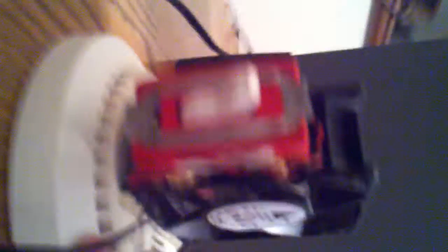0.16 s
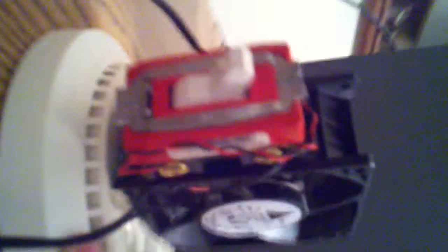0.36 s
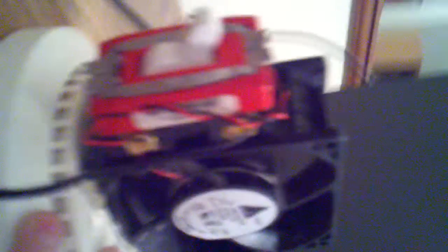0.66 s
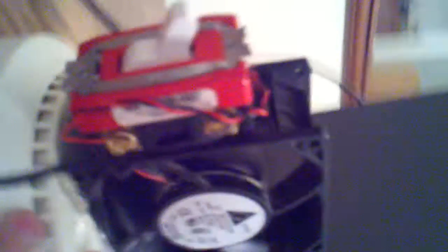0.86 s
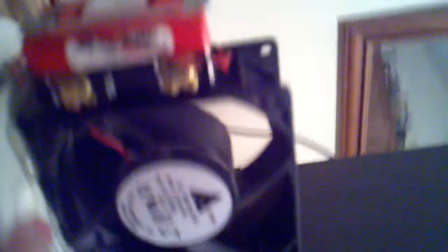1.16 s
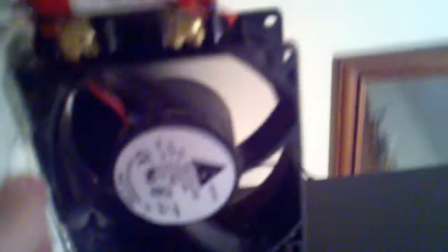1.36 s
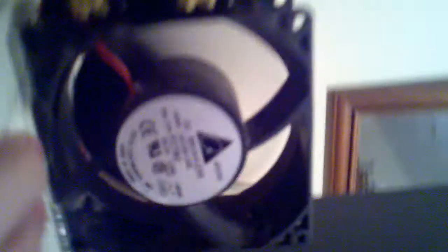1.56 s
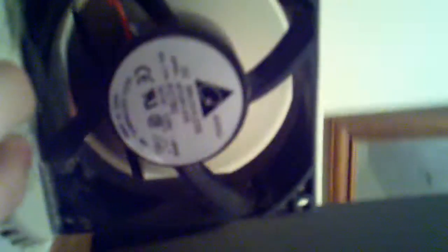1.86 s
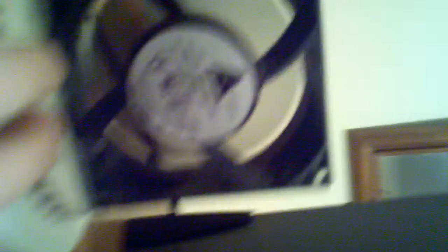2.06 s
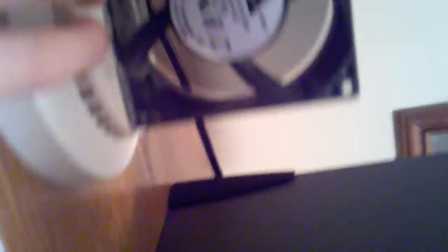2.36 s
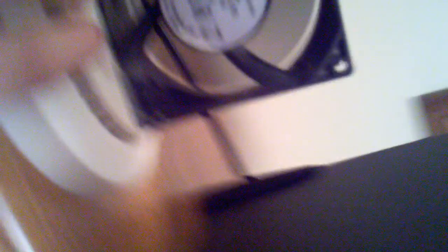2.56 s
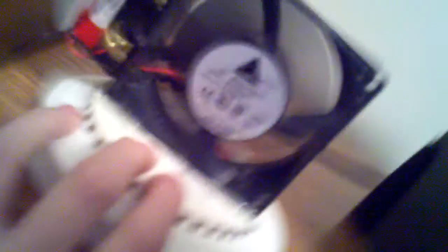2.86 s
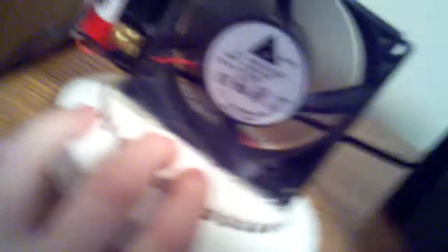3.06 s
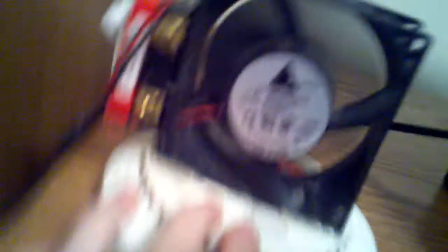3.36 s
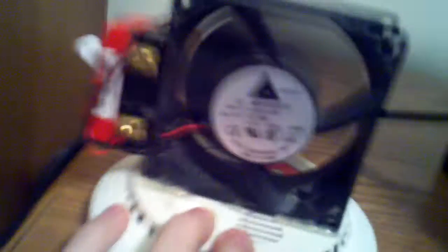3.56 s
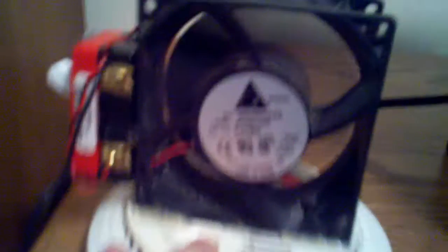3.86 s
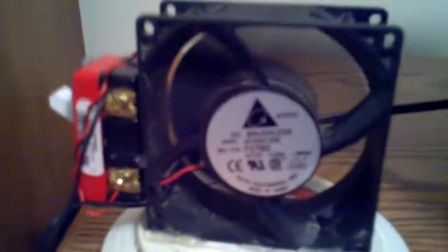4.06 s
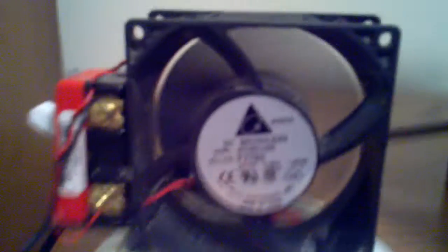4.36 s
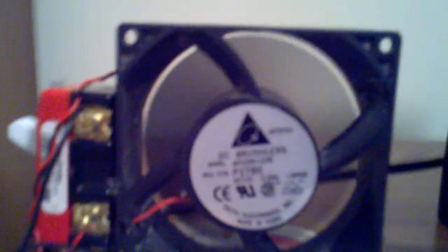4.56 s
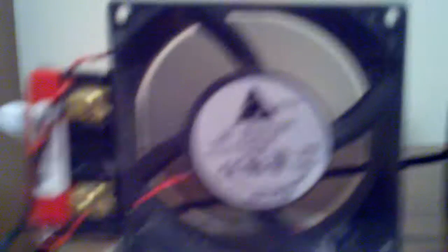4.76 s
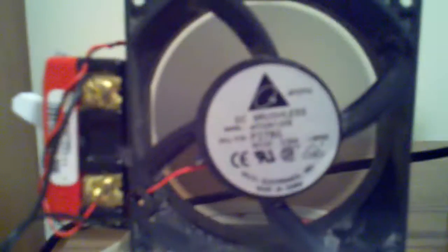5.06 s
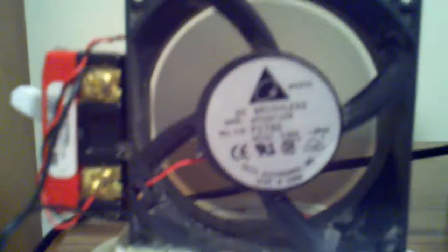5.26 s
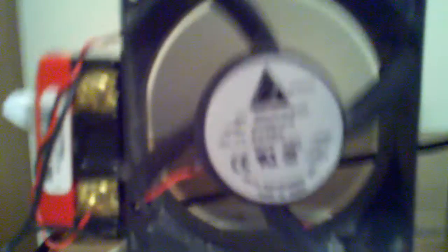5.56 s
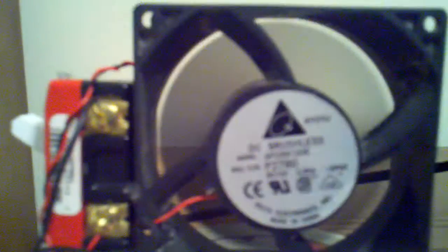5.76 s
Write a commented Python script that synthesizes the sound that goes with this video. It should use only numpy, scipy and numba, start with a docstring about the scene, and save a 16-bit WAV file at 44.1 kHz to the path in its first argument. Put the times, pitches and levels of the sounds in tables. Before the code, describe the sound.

A small cooling fan is already running at full, constant speed on a desk indoors, very close to a hand-held camera microphone. For the first second it is loud and clear: a steady nasal whine around 1 kHz, slightly wavering, with thin higher motor tones and a broad hiss of rushing air. Around 1.0-1.2 s the air stream reaches the microphone; heavy thumps, snaps and harsh crackling blasts overload it until about 1.75 s, and the automatic level drops sharply, leaving the fan faint behind. From about 1.9 to 2.5 s there is a softer, low rumbling lull with the whine audible. A thump at 2.54 s and stronger bumps from 2.7 s bring back dull, bassy buffeting. From 3.4 s it turns rougher, with dense crackles, flutters and pops, and a short hard knock near 4.55 s. It eases somewhat around 5 s, smoother and gustier, then roughens again near 5.6 s, continuing to the cut-off.

```python
"""A small brushless fan runs at full speed on a desk, close to a hand-held camera: sine blade and motor tones
over a rush of air and faint rough bands, both of filtered noise.
After a second the camera moves into the air stream and eddies buffet one of its two microphone ports:
noise rumble and crackle, with shaped pressure pulses for thumps, snaps and, later, short ringing knocks.
The first blasts push the gain control down by over 20 dB, and the fan stays faint under the buffeting."""
import sys
import numpy as np
from scipy import signal
from scipy.fft import rfft, irfft, next_fast_len
from scipy.io import wavfile
from numba import njit

SR = 44100
rng = np.random.default_rng(int(sys.argv[2]) if len(sys.argv) > 2 else 0)


def wav_record(signal):
    """Record a signal, one row per channel, as 16-bit PCM in the file named by sys.argv[1]."""
    frames = np.transpose(np.atleast_2d(signal))
    bounded = np.clip(frames, -1, 1)
    # unit amplitude maps onto the largest positive 16-bit level
    quanta = np.round(bounded * 32767).astype(np.int16)
    wavfile.write(sys.argv[1], SR, quanta)


N = 261513
TIME = np.arange(N) / SR
SIZE = next_fast_len(N + 2048)  # transform length, with room for filter tails
FREQ = np.maximum(np.arange(SIZE // 2 + 1) * SR / SIZE, 1)

# Nearness of the fan. Each row: time in seconds, change of the rushing air in dB, change of the blade tones in dB.
FAN_NEARNESS = [(0, -3, -1), (.3, -1.5, -0.5), (.6, -0.5, 0.5), (.9, 1.5, 1), (1.3, 1, -3.5), (2.3, 1, 1),
                (3.3, 0.5, 0.5), (3.9, -2.5, -6), (4.6, -1, -3), (4.9, 0.5, 0.5), (5.55, 2, 2),
                (5.93, -1, -3)]
# Air stream on the microphone. Each row: time in seconds, force in dB, roughness in dB (crackle against rumble).
AIR_STREAM = [(0, -103, -23), (.45, -82, -27), (.88, -56.5, -42), (1.14, -35, -57), (1.24, -15, -9.5),
              (1.36, -18, -9), (1.41, -18.5, -5), (1.56, -19, -3.5), (1.64, -17.5, -5), (1.77, -28.5, -6),
              (1.95, -26.5, -23), (2.25, -29.5, -68), (2.63, -26, -29), (2.74, -17.5, -16.5),
              (2.9, -19.5, -42), (3.36, -21.5, -29.5), (3.53, -15, -10), (3.85, -21, -8), (4.3, -18, -11),
              (4.43, -20, -4), (4.9, -28.5, -9), (5.36, -25.5, -11.5), (5.62, -19.5, -9), (5.78, -24, -5.5),
              (5.93, -17.5, -11.5)]
# Colours of small whirls: flutter, crackle, fizz. Each row: frequency in Hz, relative density in dB per Hz.
FLUTTER_COLOUR = [(100, -16), (200, 4), (320, 0.5), (480, -3.5), (700, -12.5), (1100, -20), (2500, -59.5)]
CRACKLE_COLOUR = [(200, -56), (450, -3), (750, -1), (1100, -3.5), (1800, -11), (2600, -26), (4000, -43),
                  (6000, -66), (10000, -63)]
FIZZ_COLOUR = [(600, -0.5), (1600, 1.5), (2500, -2), (3800, -11.5), (5000, -24), (8000, -21), (14000, -55)]


def undb(db):
    """Decibels to gain."""
    return 10 ** (np.asarray(db) / 20)


def curves(table):
    """Each column of a table, joined by straight lines in time."""
    s, *columns = np.transpose(table)
    return [np.interp(TIME, s, c) for c in columns]


def colour_gain(points):
    """Gain at each frequency from (Hz, dB) points, joined along a logarithmic pitch scale."""
    hz, db = np.transpose(points)
    return undb(np.interp(np.log(FREQ), np.log(hz), db))


def shaped_noise(gain):
    """Noise of unit level with the given gain at each frequency."""
    x = irfft(rfft(rng.standard_normal(SIZE)) * gain, SIZE)[:N]
    return x / x.std()


def noise(points):
    """Noise of unit level with the colour of (Hz, dB) points."""
    return shaped_noise(colour_gain(points))


def band_noise(centre_hz, width_hz):
    """A rough band: noise of unit level that peaks at one frequency."""
    return shaped_noise(1 / (1 + (2 * (FREQ - centre_hz) / width_hz) ** 2))


def walk(rate):
    """Smooth chance of unit spread, moving at up to about `rate` Hz."""
    return shaped_noise(1 / (1 + (FREQ / rate) ** 4))


def tones(turn, orders, waver_db):
    """Sines on multiples of the shaft angle, each wavering in level."""
    out = 0
    for order, db in orders:
        start = rng.uniform(0, 2 * np.pi)
        level = undb(db + waver_db * walk(20))
        out = out + level * np.sin(order * turn + start)
    return np.sqrt(2) * out


def both_ports(sound, lag):
    """Direct sound reaches the second port `lag` samples later."""
    return np.array([sound, np.pad(sound, (lag, 0))[:N]])


def whine(shaft_hz=93.9, wobble=0.00061, blade_waver_db=0.0, motor_waver_db=1.0,
          second_hz=1006.2, second_wobble=0.0012, second_waver_db=2.0,
          blur_db=-75.0, blur_hz=1025, blur_width_hz=70):
    """Blade and motor tones locked to the unsteady shaft, and a second whine of its own pitch with a rough skirt."""
    # Blade tones. Each row: multiple of the shaft rate, relative level in dB.
    blade_orders = [(4, -64.5), (5, -72.5), (8, -77), (12, -54), (13, -97), (21, -83)]
    # Motor tones, nine pulses to a turn: low, cogging, top. Each row: multiple of the shaft rate, relative level in dB.
    motor_groups = [(9, -61), (18, -64.5)], [(36, -67)], [(45, -70.5), (72, -80), (90, -70)]
    # Each group of motor tones swells and fades in its own way.
    # Each row: time in seconds, then the change of the low, cogging and top tones in dB.
    group_changes = [(0, -7, -9, -8), (.32, -6, -11, -10), (.55, -1.5, -4, -0.5), (.78, 2, -1, 6),
                     (.95, -3, -6, 4.5), (1.3, -3, 5, 5), (2.2, -8, 2.5, -6), (3, 1, -4.5, -3),
                     (4, -5, 0, -1.5), (5.93, -11, -5, 5)]
    # Second, less steady whine. Each row: time in seconds, level in dB about which it wavers.
    second_level = [(0, -60.5), (.45, -62.5), (.7, -68), (1.1, -71), (2.2, -60), (5.9, -60)]

    turn = 2 * np.pi * np.cumsum(shaft_hz * (1 + wobble * walk(9.4))) / SR
    blades = tones(turn, blade_orders, blade_waver_db) * undb(curves(FAN_NEARNESS)[1])
    motor = 0
    for orders, change_db in zip(motor_groups, curves(group_changes)):
        motor = motor + tones(turn, orders, motor_waver_db) * undb(change_db)

    second_turn = 2 * np.pi * np.cumsum(second_hz * (1 + second_wobble * walk(8.7))) / SR
    second_gain = undb(curves(second_level)[0] + second_waver_db * walk(22))
    second = np.sqrt(2) * second_gain * np.sin(second_turn)
    blur = undb(blur_db) * band_noise(blur_hz, blur_width_hz)
    return both_ports(blades + second + blur, lag=5) + both_ports(motor, lag=2)


def rush(air_db=-50, flicker_db=1.0, shared_hz=350):
    """Air torn by the blades: coloured noise of which the two ports share only the long waves."""
    # Rushing air. Each row: frequency in Hz, relative density in dB per Hz.
    air_colour = [(40, -23), (120, 3), (260, 1.5), (400, -3.5), (620, -3.5), (800, 0), (1000, -2.5),
                  (1400, -6), (2500, -7.5), (4500, -4), (5400, -9), (7000, -5), (9200, -5), (12000, -10),
                  (14000, -12)]
    colour = colour_gain(air_colour)
    shared = 1 / (1 + (FREQ / shared_hz) ** 2)  # part of the power common to both ports
    share = np.sum(colour ** 2 * shared) / np.sum(colour ** 2)
    common = np.sqrt(share) * shaped_noise(colour * np.sqrt(shared))
    separate = np.array([shaped_noise(colour * np.sqrt(1 - shared)) for _ in range(2)])
    own = np.sqrt(1 - share) * separate
    return (common + own) * undb(air_db + curves(FAN_NEARNESS)[0] + flicker_db * walk(15.5))


def rough_bands():
    """Faint rough bands of hiss and thin whine, rising between 1 and 1.5 s."""
    # Rough bands. Each row: centre in Hz, width in Hz, level in dB once risen.
    bands = [(1680, 110, -68), (3750, 170, -83.5), (5800, 190, -62.5), (11100, 3300, -58.5)]
    rise = np.interp(TIME, [1.0, 1.5], [.2, 1])
    ports = [sum(undb(db) * band_noise(hz, width) for hz, width, db in bands) for _ in range(2)]
    return rise * np.array(ports)


def gusts(turbulence, spread_db):
    """Bursts of unit mean power whose level in dB follows the turbulence."""
    gain = undb(spread_db * turbulence)
    return gain / np.sqrt(np.mean(gain ** 2))


def grains(points, per_s, spread_db):
    """Sharp pressure kinks of uneven size at random moments, coloured by (Hz, dB) points; unit level."""
    struck = rng.random(N) < per_s / SR
    kinks = struck * undb(spread_db * rng.uniform(-1.04, 1, N))
    x = irfft(rfft(kinks, SIZE) * colour_gain(points), SIZE)[:N]
    return (x - x.mean()) / x.std()


def lulls(push_db, rough_db, lull_db=5, lull_hz=24, edge_db=-27, core_db=-14):
    """At the edge of the jet, where the flow is weak but rough, it comes in puffs with lulls between them (dB)."""
    at_edge = np.clip((core_db - push_db) / (core_db - edge_db), 0, 1)
    return lull_db * at_edge * undb(rough_db / 3) * (np.tanh(2 * walk(lull_hz)) - .5)


def stream(surge_db=-13, surge_growth=0.67, rumble_db=-1, flutter_db=3.5, crackle_db=-4, fizz_db=-6.0,
           rumble_spread_db=2.5, flutter_spread_db=2.0, crackle_spread_db=3.0, fizz_spread_db=4,
           fizz_growth=1.68):
    """Turbulence on the port: gentle flow surges and rumbles; rough flow adds small whirls that crackle in bursts."""
    # Deep surge and rumble of the flow. Each row: frequency in Hz, relative density in dB per Hz.
    surge_colour = [(20, -17), (40, 0.5), (70, -11.5), (105, -0.5), (150, -3), (250, -57), (600, -86)]
    rumble_colour = [(20, -32), (40, -51), (80, -3.5), (130, 5), (200, 1), (280, -2), (380, -11.5),
                     (520, -32), (800, -84), (2000, -79)]
    push_db, rough_db = curves(AIR_STREAM)
    push_db = push_db + lulls(push_db, rough_db)
    # slow and fast chance together, held within bounds
    turbulence = 2 * np.tanh((1.3 * walk(28.5) + 1.7 * walk(314)) / 2)

    surge = undb(surge_db + surge_growth * push_db) * noise(surge_colour)
    rumble = undb(rumble_db) * gusts(turbulence, rumble_spread_db) * noise(rumble_colour)
    flutter = undb(flutter_db) * gusts(turbulence, flutter_spread_db) * noise(FLUTTER_COLOUR)
    crackle_grains = grains(CRACKLE_COLOUR, per_s=700, spread_db=9.5)
    crackle = undb(crackle_db) * gusts(turbulence, crackle_spread_db) * crackle_grains
    fizz_grains = grains(FIZZ_COLOUR, per_s=1000, spread_db=-1.5)
    fizz = undb(fizz_db) * gusts(turbulence, fizz_spread_db) * fizz_grains

    # the finer the whirls, the more they depend on roughness
    whirls = undb(rough_db / 2) * flutter + undb(rough_db) * crackle + undb(fizz_growth * rough_db) * fizz
    return surge + undb(push_db) * (rumble + whirls)


def random_eddies(median_gap_s=1 / 17, smoothing=0.14, thump_db=7.5, crackle_db=9.5, spread_db=5):
    """Rows (s, thump dB, crackle dB) of eddies shed at uneven intervals, following the stream's force and roughness."""
    gap, thump, crackle = rng.standard_normal((400, 3)).T
    times = np.cumsum(np.exp(.7 * gap)) * median_gap_s
    push_db, rough_db = (np.interp(times, TIME, c) for c in curves(AIR_STREAM))
    thumps_db = push_db + smoothing * rough_db + thump_db + spread_db * thump
    crackles_db = push_db + rough_db + crackle_db + spread_db * crackle
    rows = np.column_stack([times, thumps_db, crackles_db])
    return rows[times < TIME[-1]]


def bursts(times, dbs, source, rise_s, fall_s):
    """A short bell-shaped piece of the source at each time, brought to the given level."""
    out = np.zeros(N)
    for s, db in zip(times, dbs):
        near = slice(*np.searchsorted(TIME, [s - 4 * rise_s, s + 4 * fall_s]))
        t = TIME[near] - s
        shape = np.exp(-.5 * (t / np.where(t < 0, rise_s, fall_s)) ** 2)
        piece = shape * source[near]
        levelling = np.sqrt(np.sum(shape ** 2) / (np.sum(piece ** 2) + 1e-18))
        out[near] += undb(db) * piece * levelling
    return out


def eddies(rows, thump_db=1.5, core_s=0.00056, reach_s=0.0037, wake_db=-9, wake_rise_s=0.0028, wake_s=0.0048,
           burst_rise_s=0.0012, burst_s=0.0012, crackle_db=-2.0, fizz_db=-12.5):
    """An eddy crossing the port gives a pointed push between shallow troughs, a fluttering wake and a crackle."""
    thumps = np.zeros(N)
    chance = rng.standard_normal((len(rows), 2))
    for (s, db, _), (lean, girth) in zip(rows, chance):
        near = slice(*np.searchsorted(TIME, [s - 5 * reach_s, s + 5 * reach_s]))
        t = (TIME[near] - s) * np.exp(0.12 * girth)
        push = 1 / (core_s + 1j * t) - 1 / (reach_s + 1j * t)
        leaning = np.real(np.exp(.6j * lean) * push)  # the lean makes the push lopsided
        swirl = leaning * np.exp(-.5 * (t / reach_s) ** 2)
        thumps[near] += undb(db + thump_db) * swirl / np.abs(swirl).max()

    times, push_db, burst_db = np.transpose(rows)
    wake = bursts(times, push_db + wake_db, noise(FLUTTER_COLOUR), wake_rise_s, wake_s)
    crackle = grains(CRACKLE_COLOUR, per_s=2700, spread_db=6.5)
    fizz = undb(fizz_db) * grains(FIZZ_COLOUR, per_s=2500, spread_db=6.5)
    breakup = bursts(times, burst_db + crackle_db, crackle + fizz, burst_rise_s, burst_s)
    return thumps + wake + breakup


def snaps(snap_db=-2, lean_spread=0.5, swarm_db=-8, swarm_s=0.0024, swarm_spread_db=2, port_hz=5200, count=4):
    """Pressure snaps, sharp to dull as their cores widen, each a swing of pressure amid weaker ones."""
    # Pressure snaps. Each row: time in seconds, relative level in dB, width of the core in seconds.
    pressure_snaps = [(1.2223, -8, 0.00017), (1.2424, -10.5, 0.00015), (1.2803, -12, 0.00013),
                      (1.3023, -9, 0.00015), (1.3992, -8, 0.00013), (1.4092, -8.5, 0.0001),
                      (1.4197, -10, 0.00011), (1.4404, -8, 0.00017), (1.4603, -7, 0.00019),
                      (1.477, -8, .00018), (1.49, -6, 0.00018), (1.5495, -10, .00016),
                      (1.5675, -6, 0.00016), (1.5975, -2, 0.00017), (1.6113, -5, 0.00017),
                      (1.6459, -17, .00018), (1.867, -12.5, 0.00038), (2.537, -8, .00022),
                      (2.748, -4.5, .00033), (2.799, -10, 0.00045), (2.827, -6, 0.00036),
                      (3.4416, -6, .00015), (3.552, -8.5, .0002), (3.5958, -9, 0.00016),
                      (3.6382, -5.5, 0.00014), (3.726, -9.5, 0.00017), (3.7754, -11, 0.00017),
                      (3.9637, -12.5, 0.00016), (4.03, -10, 0.00018), (4.0473, -5.5, .0002),
                      (4.08, -8, 0.00021), (4.15, -13, 0.00014), (4.174, -11, 0.00028),
                      (4.4209, -7.5, 0.00014), (4.4444, -14, .0002), (4.6075, -10.5, .00015),
                      (5.1205, -8, 0.00036), (5.3655, -11, 0.0002), (5.39, -12, 0.00032),
                      (5.643, -4.5, 0.00016), (5.6617, -8.5, 0.00016), (5.728, -8, 0.00021)]
    out = np.zeros(N)
    weaker = np.arange(count + 1) > 0  # the first is the main snap, the others its swarm
    chance = rng.standard_normal((len(pressure_snaps), 3, count + 1))
    for (s, db, core_s), (lean, late, size) in zip(pressure_snaps, chance):
        near = slice(*np.searchsorted(TIME, [s - .02, s + .02]))
        t = TIME[near, None] - s - weaker * swarm_s * late
        swings = np.imag(np.exp(1j * lean_spread * lean) / (1 + 1j * t / core_s) ** 2)
        out[near] += swings @ undb(db + snap_db + weaker * (swarm_db + swarm_spread_db * size))
    return signal.sosfilt(signal.butter(3, port_hz, fs=SR, output="sos"), out)


def stalls(width_s=0.0059, deeper_db=-1):
    """Gain of the air stream: brief bell-shaped changes, mostly dips, often just before a timed eddy."""
    # Stalls of the flow. Each row: time in seconds, change in dB before the common deepening.
    stall_moments = [(1.265, -4), (1.292, -4), (1.316, -1), (1.361, 3.5), (1.45, -0.5), (1.496, -0.5),
                     (1.588, -6.5), (1.604, -6), (1.635, -9.5), (1.703, 4.5), (1.784, 1), (2.766, -3),
                     (2.816, -3), (2.966, -12), (3.104, -2), (3.223, -10), (3.338, -17), (3.491, -2),
                     (3.529, -14.5), (3.664, -17), (3.707, -7), (4.014, -9.5), (4.162, -13), (4.268, -12),
                     (4.293, -3), (4.311, -6.5), (4.535, -3.5), (4.586, -3), (4.634, 4), (4.688, -3),
                     (4.72, -8), (4.798, -8), (4.916, -16), (4.989, -17), (5.09, -11), (5.134, -10),
                     (5.204, -5), (5.228, -5), (5.306, -11), (5.356, -25), (5.411, -9), (5.482, -8),
                     (5.573, -7), (5.803, -14), (5.85, -4.5), (5.911, -18)]
    return undb(sum((db + deeper_db) * np.exp(-.5 * ((TIME - s) / width_s) ** 2) for s, db in stall_moments))


def knocks(ring_hz=1580, ring_s=0.00055, edge_s=0.00058, edge_late_s=0.00037):
    """Short ringing knocks with a bright edge: a few cycles of the port's own pitch under a burst of noise."""
    # Ringing knocks. Each row: time in seconds, ring level in dB, edge level in dB.
    ringing_knocks = [(1.531, -10, -17), (3.4408, -21, -21.5), (4.5495, -5.5, -16.5)]
    # Bright edge of a knock. Each row: frequency in Hz, relative density in dB per Hz.
    edge_colour = [(1000, -15), (2400, 11), (3700, 6), (5200, -2), (7000, -0.5), (10000, -4), (14000, -6)]
    ring = 0
    for s, db, _ in ringing_knocks:
        t = TIME - s
        ring = ring + undb(db) * np.exp(-.5 * (t / ring_s) ** 2) * np.sin(2 * np.pi * ring_hz * t)
    times, _, edge_db = np.transpose(ringing_knocks)
    return ring + bursts(times + edge_late_s, edge_db, noise(edge_colour), edge_s, edge_s)


def scene(low_cut_hz=65):
    """The fan reaches both ports; the air stream strikes only the left one, whose capsule passes little deep bass."""
    # Eddies at set moments, weak to strong.
    # Each row: time in seconds, relative thump level in dB, relative crackle level in dB.
    timed_eddies = [(0.971, -34, -64), (0.988, -29, -59), (1.009, -19.5, -62), (1.117, -15, -28.5),
                    (1.127, -13.5, -31), (1.18, -18, -48), (1.215, -14, -23), (1.223, -1, -27),
                    (1.243, -7.5, -23), (1.279, -21, -37), (1.305, -11, -28), (1.331, -14, -25),
                    (1.37, -17, -30), (1.394, -12, -22), (1.403, -11, -32), (1.412, -11, -28),
                    (1.423, -11, -24), (1.432, -8, -12), (1.459, -18, -19), (1.478, -1, -26),
                    (1.513, -6, -16), (1.526, -8, -20), (1.531, -9, -41), (1.542, -7, -17),
                    (1.566, -19, -23), (1.58, -22, -14), (1.597, -11.5, -23), (1.611, -18, -26),
                    (1.651, -15, -27), (1.668, -8, -18), (1.715, -21, -34), (1.729, -15, -15.5),
                    (1.752, -9.5, -29), (1.791, -16, -42), (1.867, -15.5, -22), (2.538, -4.5, -17),
                    (2.683, -11.5, -48), (2.711, -13, -26), (2.732, -12, -22), (2.748, -3, -23),
                    (2.779, -12, -34), (2.799, -7, -25), (2.828, -4, -20.5), (2.85, -9.5, -34),
                    (2.938, -16, -24), (2.955, -13, -39), (2.993, -11, -21), (3.016, -12.5, -34),
                    (3.044, -16, -22.5), (3.063, -7.5, -21.5), (3.13, -7.5, -22), (3.18, -15, -30),
                    (3.207, -13, -28), (3.24, -5.5, -19), (3.254, -7.5, -17.5), (3.292, -15, -47),
                    (3.305, -28, -46), (3.37, -18, -32), (3.443, -4, -40), (3.464, -13, -24),
                    (3.476, -12.5, -34), (3.514, -3.5, -22), (3.56, -20, -18), (3.597, -5, -41),
                    (3.638, -7, -15), (3.653, -22, -25), (3.682, -25, -16), (3.697, -11.5, -17),
                    (3.723, -10, -19.5), (3.773, -3, -16), (3.824, -17, -16), (3.839, -7, -20),
                    (3.86, -19, -18.5), (3.878, -16, -37), (3.901, -6.5, -21), (3.938, -14, -18),
                    (3.971, -5.5, -22), (4.0, -10, -23), (4.029, -8, -14.5), (4.122, -12, -17.5),
                    (4.15, -30, -15), (4.174, -11, -20), (4.194, -8, -24), (4.207, -21, -20),
                    (4.223, -10, -22), (4.243, -15, -31), (4.282, -14.5, -19.5), (4.341, -7.5, -41),
                    (4.401, -5, -17), (4.437, -7, -19), (4.466, -22, -34), (4.503, -18, -16),
                    (4.551, -2.5, -25), (4.575, -16, -20), (4.612, -14, -20), (4.652, -10.5, -16.5),
                    (4.667, -6.5, -15.5), (4.702, -12, -18.5), (4.741, -13, -21), (4.754, -11, -19.5),
                    (4.78, -17, -24), (4.818, -9, -27.5), (4.89, -16.5, -27), (4.928, -15.5, -48),
                    (4.949, -16, -43), (5.012, -13.5, -43), (5.048, -8, -22.5), (5.08, -24, -47),
                    (5.113, -14, -23.5), (5.121, -3, -29), (5.148, -20, -30), (5.162, -13, -24),
                    (5.186, -20, -26), (5.254, -8, -26), (5.272, -9.5, -22), (5.294, -9, -28),
                    (5.323, -7.5, -18.5), (5.346, -15, -26), (5.365, -14, -24), (5.39, -16, -17),
                    (5.433, -15, -28), (5.446, -11, -25), (5.52, -15, -22), (5.546, -10, -43),
                    (5.562, -10, -42), (5.591, -7, -38), (5.603, -26, -24), (5.624, -9, -15),
                    (5.646, -5, -14), (5.657, -1, -18), (5.684, -22, -26), (5.697, -14, -21.5),
                    (5.716, -21, -29), (5.729, -19, -34), (5.742, -24, -19), (5.772, -12, -19.5),
                    (5.82, -16, -24), (5.873, -10, -18.5)]
    steady = whine() + rush() + rough_bands()
    flow = stalls() * (stream() + eddies(random_eddies()))
    buffeting = flow + eddies(timed_eddies) + snaps() + knocks()
    wind = signal.sosfilt(signal.butter(2, low_cut_hz, "high", fs=SR, output="sos"), buffeting)
    return steady + np.array([[1], [0]]) * wind


def widen(ports, low=1.0, high=0.23, edge_hz=4300, lag=17):
    """Stereo widening: each channel has the opposite port, `lag` samples late, taken away, less so in the treble."""
    cross = high + (low - high) / (1 + (FREQ / edge_hz) ** 16)
    delay = np.exp(-2j * np.pi * FREQ * lag / SR)
    spectra = rfft(ports, SIZE)
    return irfft(spectra - cross * delay * spectra[::-1], SIZE)[:, :N]


@njit
def gain_control(power, open_db, limit_db, fall_db_per_s, sense_s):
    """The gain starts wide open and sinks, down to unity, while the output is over the limit; it never recovers."""
    out, gain_db, heard = np.empty(len(power)), open_db, 1e-12
    for i in range(len(power)):
        heard += (power[i] - heard) / (sense_s * SR)
        over_db = 10 * np.log10(heard + 1e-18) + gain_db - limit_db
        haste = min(1., max(0., over_db / 2))  # full rate from 2 dB over
        gain_db = max(0., gain_db - fall_db_per_s / SR * haste)
        out[i] = gain_db
    return out


def record(dry):
    """The camera widens the stereo, turns its gain down, rounds the peaks and cuts the top."""
    wide = widen(dry)
    power = np.mean(wide ** 2, axis=0)
    gain_db = gain_control(power, open_db=22.5, limit_db=-19.0, fall_db_per_s=452.0, sense_s=0.01)
    loud = wide * undb(gain_db)
    rounded = loud / (1 + loud ** 4) ** .25
    top_cut = signal.ellip(10, .2, 70, 13950, fs=SR, output="sos")  # steep, at 13950 Hz
    return signal.sosfilt(top_cut, rounded)


dry = scene()
out = record(dry)
wav_record(out)
```